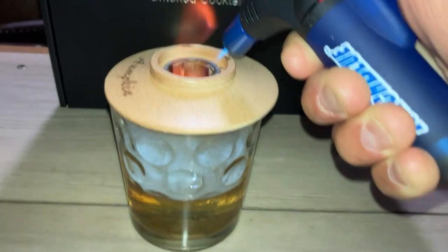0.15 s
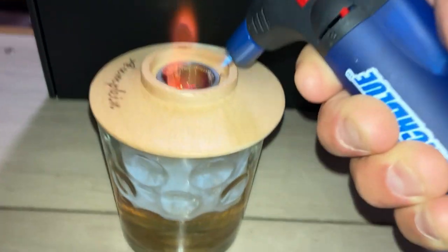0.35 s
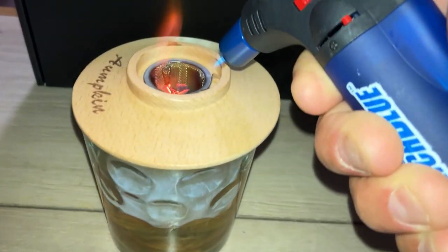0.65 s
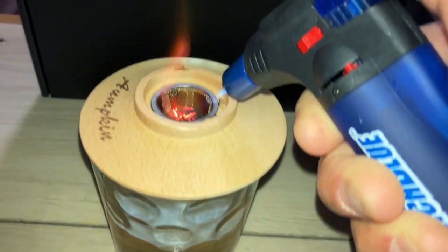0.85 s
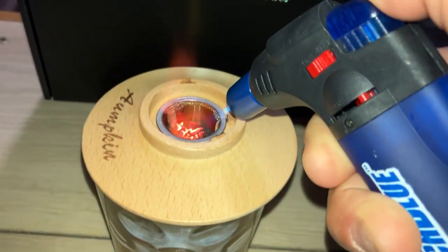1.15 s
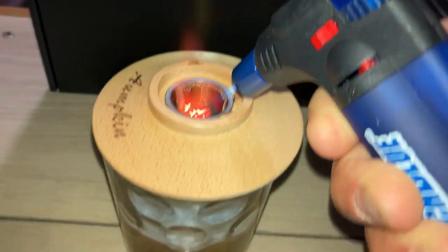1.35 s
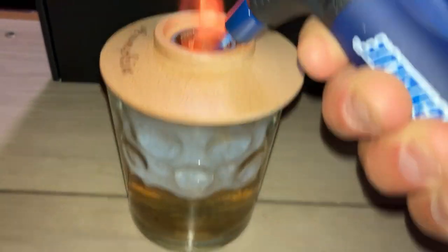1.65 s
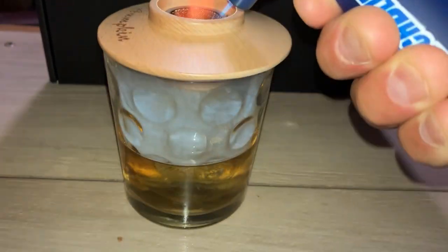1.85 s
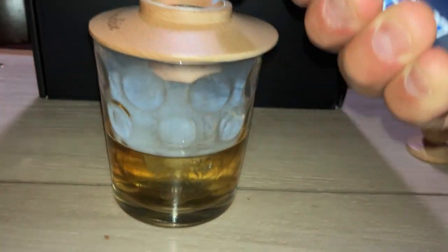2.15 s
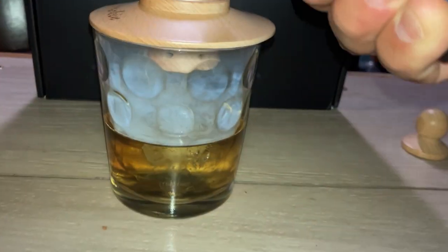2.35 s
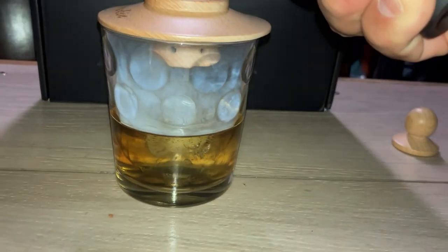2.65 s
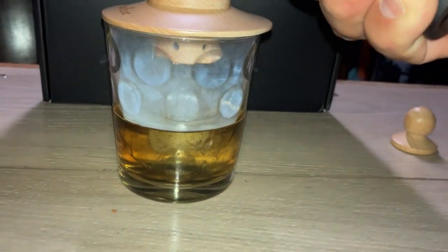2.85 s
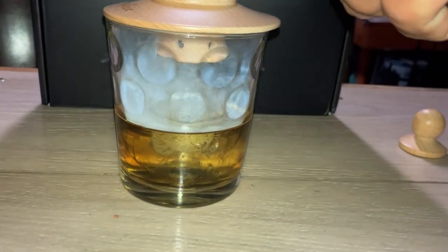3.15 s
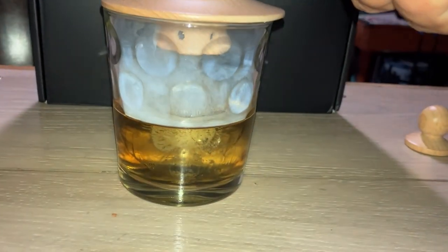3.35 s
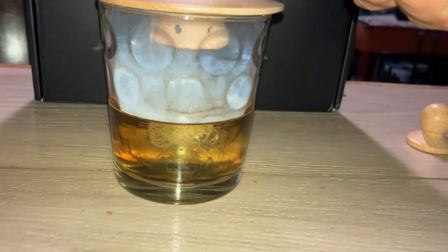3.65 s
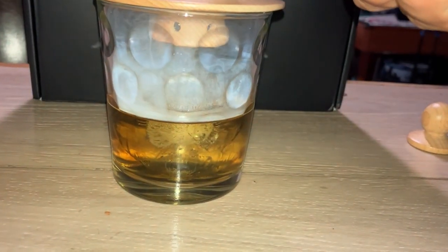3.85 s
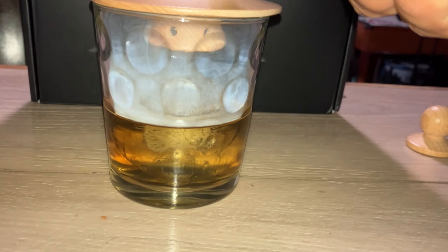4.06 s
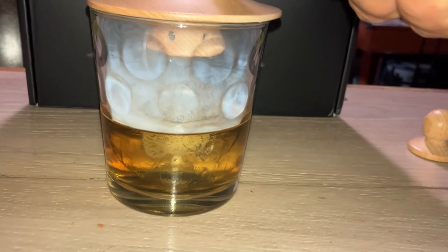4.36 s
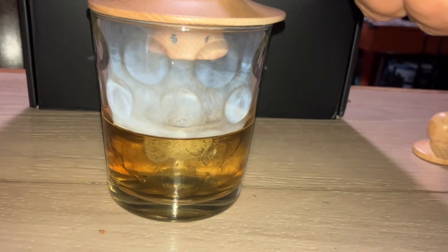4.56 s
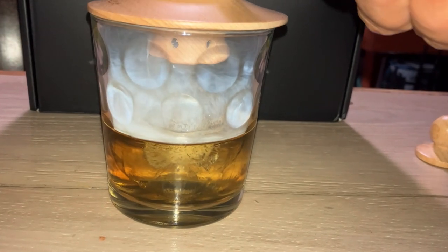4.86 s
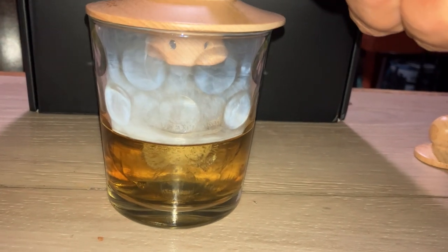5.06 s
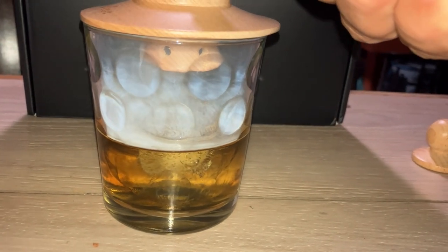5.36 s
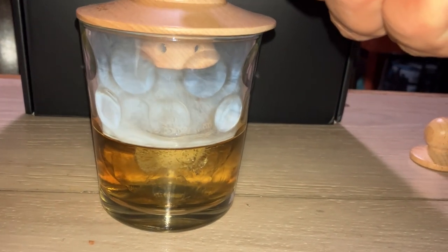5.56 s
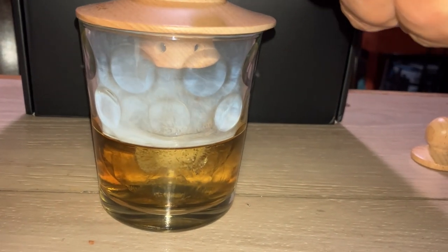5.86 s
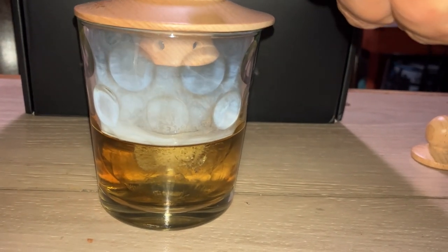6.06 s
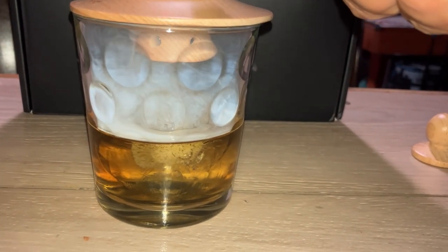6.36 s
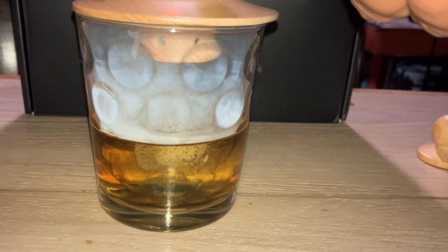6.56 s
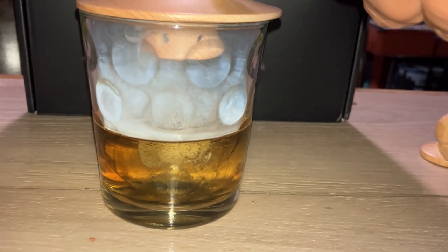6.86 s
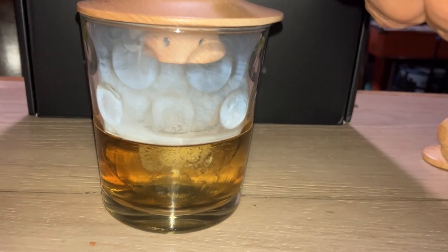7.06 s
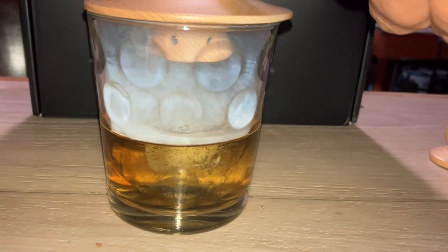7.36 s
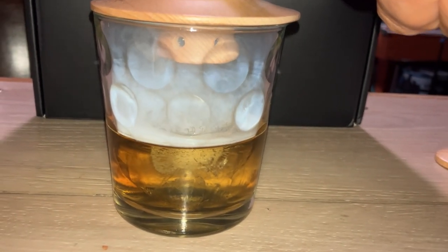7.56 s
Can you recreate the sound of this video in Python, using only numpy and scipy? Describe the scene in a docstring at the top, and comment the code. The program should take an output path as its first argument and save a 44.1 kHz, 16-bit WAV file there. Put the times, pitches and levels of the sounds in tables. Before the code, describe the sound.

A small gas torch hisses and roars hollowly inside a little wooden cup, then burns steadily in open air over a low refrigerator hum.

```python
"""In a small room, a handheld butane torch burns into the wood-chip cup of a cocktail smoker, close to the microphone.
The gas jet is very high, shaped noise that hisses. The flame is patchy noise: it roars in the cup's cavity,
whose resonances swell and sink, then it is lifted away and burns in free air.
Behind it a refrigerator hums and throbs as steady tones over the room's rumble of low noise.
At the start the hand makes two soft bumps, each a short ring of fading tones."""
import sys
import numpy as np
from scipy import signal
from scipy.fft import rfft, irfft, next_fast_len
from scipy.io import wavfile
from scipy.ndimage import uniform_filter1d, map_coordinates

SR = 44100
rng = np.random.default_rng(int(sys.argv[2]) if len(sys.argv) > 2 else 0)


def persist_wave(psi):
    """Save psi, clipped to +-1, as 16-bit WAV."""
    counts = np.round(np.clip(psi, -1, 1) * 32767).astype(np.int16)
    wavfile.write(sys.argv[1], SR, np.atleast_2d(counts).T)


N = 340398  # length in samples
FRAME = 1024  # length of one short-time spectrum, in samples


def amp(db):
    """Turn decibels into gain."""
    return 10 ** (np.asarray(db) / 20)


def bell(x, centre, width):
    """A smooth hump of height 1."""
    return np.exp(-((x - centre) / width) ** 2)


def along(points, hz):
    """Read (Hz, value) points on a log-frequency axis."""
    point_hz, values = np.transpose(points)
    return np.interp(np.log(hz + 1), np.log(point_hz + 1), values)


def density(points, hz):
    """A spectrum in dB that falls by a further 60 dB per octave above its last point."""
    octaves_above = np.log2(np.maximum(hz / points[-1][0], 1))
    return along(points, hz) - 60 * octaves_above


def grid():
    """Frequencies (a column) and times (a row) of the short-time spectrum."""
    hz, s, _ = signal.stft(np.zeros(N), SR, nperseg=FRAME)
    return hz[:, None], s


def curves(rows, s):
    """Read each column of a curve table at the times s."""
    times, *columns = np.transpose(rows)
    return [np.interp(s, times, column) for column in columns]


def wobble(s, rate):
    """A smooth random curve with this many knots a second."""
    knots = rng.standard_normal(int(s[-1] * rate) + 4)
    return map_coordinates(knots, [s * rate])


# How alike the two channels are for torch and room.
# Each row: frequency in Hz, left-right likeness from 0 to 1.
CHANNEL_ALIKE = [(60, .97), (160, .96), (300, .8), (500, .6), (650, .8), (820, .5), (1000, .75),
                 (1300, .65), (1500, .88), (1750, .98), (1860, .98), (2000, .9), (2120, .6), (2550, .9),
                 (2900, .65), (3200, .7), (3600, .2), (4200, .4), (4700, .87), (5100, .8), (5450, .15),
                 (6000, .9), (6300, .97), (8500, .88), (9800, .98), (11000, .92), (13500, .96),
                 (15000, .96), (15800, .7)]
# Phase between the two channels for torch and room.
# Each row: frequency in Hz, phase by which left leads in radians.
CHANNEL_PHASE = [(0, 0), (350, -.2), (700, 0), (820, -2.8), (900, -1.6), (1000, -.6), (1270, -1.4),
                 (1450, -.8), (1820, -3.14), (1980, -4.1), (2280, -9.9), (2450, -9.5), (2830, -10.9),
                 (2940, -15.6), (3080, -16.2), (3400, -18.8), (3600, -22), (4000, -24.1), (5100, -25.8),
                 (5400, -26), (5650, -28.1), (6370, -28.35), (9390, -22.4), (10200, -21.7), (11100, -19),
                 (11600, -18.5), (14600, -12.9), (15900, -10.6)]
# How the level differs between the two channels.
# Each row: frequency in Hz, left minus right in dB.
CHANNEL_TILT = [(60, 14.5), (200, -2.5), (400, 0.5), (500, -4), (650, -1.5), (800, -2), (920, -8.5),
                (1080, -2.5), (1300, -5), (1550, -1.5), (1830, 0), (2060, 0), (2150, -2.5), (2260, -2),
                (2420, -6), (2620, 2), (2950, -5), (3500, -0.5), (6000, 0)]


def turbulence(level_db, patchy_db, alike=CHANNEL_ALIKE, phase=CHANNEL_PHASE, slide=1):
    """Stereo noise with a level per Hz that can move in time, broken into small eddies of random strength."""
    hz, _ = grid()
    noise = rng.standard_normal((2, N))
    # sqrt(SR / 2) gives the noise a level of 0 dB per Hz
    common, diffuse = signal.stft(noise, SR, nperseg=FRAME)[2] * np.sqrt(SR / 2)

    eddies = rng.standard_normal(common.shape)
    eddies = uniform_filter1d(eddies, size=9, axis=0)
    eddies = uniform_filter1d(eddies, size=7, axis=1)
    gain = amp(level_db + patchy_db * eddies / eddies.std())

    # the common part is in both channels; the diffuse part sets them apart
    pattern_hz = hz / slide
    turn = np.arccos(np.clip(along(alike, pattern_hz), 0, 1)) / 2
    half_phase = np.exp(.5j * np.interp(pattern_hz, *np.transpose(phase)))
    balance = amp(along(CHANNEL_TILT, pattern_hz) / 2) * half_phase
    left = (np.cos(turn) * common + np.sin(turn) * diffuse) * balance
    right = (np.cos(turn) * common - np.sin(turn) * diffuse) / balance
    return signal.istft(np.array([left, right]) * gain, SR, nperseg=FRAME)[1][:, :N]


# Short echoes from nearby surfaces.
# Each row: mean delay in seconds, strength as a share, sway of the delay in seconds.
NEAR_ECHOES = [(.0011, .16, .00002), (.0019, .16, .00003), (.0031, .12, .00004)]


def reflections(hz, s):
    """Ripple in dB from lid, box and table: their short echoes slide as the hand sways, and comb the sound."""
    total = 1
    for delay, share, sway in NEAR_ECHOES:
        moving_delay = delay + sway * wobble(s, rate=1.56)
        total = total + share * np.exp(-2j * np.pi * hz * moving_delay)
    return 20 * np.log10(np.abs(total) + 1e-3)


# The room's low rumble, before its slight patchiness.
# Each row: frequency in Hz, level in dB per Hz.
ROOM_RUMBLE = [(20, -100), (38, -98), (80, -69), (106, -47), (117, -57.5), (124, -61.5), (135, -54.5),
               (150, -58), (175, -60.5), (205, -62.5), (225, -60), (268, -58.5), (292, -64), (314, -64),
               (335, -61.5), (360, -72.5), (400, -70), (600, -77.5), (1200, -114)]


def room():
    """Moving air and machinery fill the room with a low, even rumble."""
    hz, _ = grid()
    return turbulence(density(ROOM_RUMBLE, hz), patchy_db=0.5)


# The tones of the refrigerator's compressor and fan, before waver and swell.
# Each row: frequency in Hz, rms level in dB.
FRIDGE_TONES = [(35.5, -71), (49.2, -60.5), (59.1, -42.5), (112.6, -36), (120.0, -43.5), (159.3, -49),
                (181.5, -52.5), (318.5, -55), (337.7, -54.5)]
# The hum swells as the microphone moves through the room's standing waves.
# Each row: time in seconds, gain in dB.
FRIDGE_SWELL = [(0, -1), (0.8, 0.5), (2.2, 2), (3.5, 1.5), (4.8, 1), (5.8, 2), (7.7, 2)]


def refrigerator(drift_rad=0.097, waver_db=0.36):
    """Steady motor tones; twice the shaft speed beats against twice the mains about seven times a second."""
    t = np.arange(N) / SR
    swell_db, = curves(FRIDGE_SWELL, t)
    hum = np.zeros(N)
    for hz, db in FRIDGE_TONES:
        phase = 2 * np.pi * (hz * t + rng.random()) + drift_rad * wobble(t, rate=1.83)
        peak = np.sqrt(2) * amp(db + waver_db * wobble(t, rate=3.53))
        hum += peak * np.sin(phase)
    return amp(swell_db) * hum


# The soft bumps of the hand.
# Each row: start in seconds, level in dB.
HAND_BUMPS = [(0.0868, -24), (0.225, -18.5)]
# The tones that each bump rings with.
# Each row: frequency in Hz, level in dB relative to the bump, time in seconds to fade by 60 dB.
BUMP_TONES = [(480, -8, .022), (655, 0, .021), (850, -9, .014)]


def bumps(attack_s=0.001):
    """Each soft contact rings a few modes that die away quickly."""
    out = np.zeros(N)
    t = np.arange(SR // 10) / SR
    ring = np.zeros(len(t))
    for hz, db, t60 in BUMP_TONES:
        ring += amp(db - 60 * t / t60) * np.sin(2 * np.pi * hz * t)
    ring *= 1 - np.exp(-t / attack_s)
    for start, db in HAND_BUMPS:
        out[round(start * SR):][:len(t)] += amp(db) * ring
    return out


# The hiss of the nozzle.
# Each row: frequency in Hz, dB per Hz relative to the jet's level.
JET_HISS = [(11800, -77.5), (12600, -52), (13200, -39), (13650, -32.5), (14200, -33), (14750, -33),
            (15100, -36), (15400, -39), (15800, -45)]
# Level of that hiss over time.
# Each row: time in seconds, level in dB.
JET_LEVEL = [(0, -31), (.17, -32), (.25, -35.5), (.45, -32.5), (.7, -32.5), (1.04, -37), (1.4, -35),
             (1.6, -34.5), (1.8, -44), (1.95, -38.5), (2.03, -38), (2.16, -36), (2.3, -41.5), (2.45, -41.5),
             (2.69, -35.5), (2.87, -43), (3.14, -37), (3.38, -41), (3.72, -43), (3.82, -40), (4.45, -38),
             (4.56, -33.5), (4.71, -36.5), (4.9, -33), (5.27, -40.5), (5.42, -37.5), (6.3, -36),
             (7.0, -35.5), (7.35, -39), (7.72, -37)]
# The lower shoulder of the hiss.
# Each row: frequency in Hz, dB per Hz relative to the shoulder's level.
SHOULDER_HISS = [(9000, -89), (10300, -38), (11000, -34.5), (11450, -32), (12050, -30.5), (12450, -24),
                 (12900, -23), (13400, -28), (14000, -51)]
# Level of the lower shoulder.
# Each row: time in seconds, level in dB.
SHOULDER_LEVEL = [(0.0, -52.5), (0.6, -46.5), (1.63, -48), (2.15, -46), (2.34, -50), (2.43, -53),
                  (2.73, -54), (2.84, -54.5), (3.24, -54), (3.53, -55), (4.02, -54), (4.43, -47.5),
                  (4.73, -50), (4.84, -47.5), (5.7, -51.5), (6.81, -47), (7.52, -48.5), (7.72, -48)]
# A bright band in the upper hiss that glides as the nozzle turns.
# Each row: time in seconds, centre in Hz, height in dB.
BRIGHT_BAND = [(0, 14700, 0), (.2, 14700, 7), (.35, 13800, 2), (.6, 13800, 5), (.8, 13900, 7),
               (1.1, 14200, 3), (1.35, 14500, 5), (1.47, 14000, 8), (1.62, 14750, 5), (1.77, 14500, 2),
               (1.97, 14400, 3), (2.17, 14200, 6), (2.3, 14650, 5), (2.45, 14200, 8), (2.7, 14400, 5.5),
               (2.88, 14900, 7), (3.15, 14950, 7), (3.35, 15200, 5), (3.55, 13900, 4), (3.9, 14200, 8),
               (4.3, 14300, 5), (4.6, 14300, 4), (4.9, 14050, 5.5), (5.4, 14000, 3.5), (6.3, 14000, 3.5),
               (7.1, 13800, 0.5), (7.72, 13750, 6)]
# A gliding band, mostly below the bright one; it is dark, or bright where the depth is negative.
# Each row: time in seconds, centre in Hz, depth in dB.
DARK_BAND = [(0, 12700, 6), (.4, 12600, 4), (2.2, 12900, 0), (2.4, 13050, 7), (2.9, 12900, 2),
             (3.3, 12200, -3), (3.6, 12300, 7), (4.1, 12600, 8), (4.5, 12350, -1), (5.1, 12450, -1),
             (5.5, 12500, 5), (6.2, 12650, 7), (7.2, 13000, 6), (7.72, 13050, 4)]
BRIGHT_WIDTH_HZ, DARK_WIDTH_HZ = 350, 260  # half-widths


def jet():
    """Gas leaves the tiny nozzle with a high hiss; a bright and a dark band glide through it."""
    hz, s = grid()
    level_db, = curves(JET_LEVEL, s)
    shoulder_db, = curves(SHOULDER_LEVEL, s)
    bright_hz, height_db = curves(BRIGHT_BAND, s)
    dark_hz, depth_db = curves(DARK_BAND, s)

    bright_db = height_db * bell(hz, bright_hz, BRIGHT_WIDTH_HZ)
    colour_db = 0.51 * reflections(hz, s) + 0.28 * wobble(s, rate=18)
    colour_db = colour_db - depth_db * bell(hz, dark_hz, DARK_WIDTH_HZ)
    top = turbulence(density(JET_HISS, hz) + level_db + bright_db + colour_db, patchy_db=1.0)
    shoulder = turbulence(density(SHOULDER_HISS, hz) + shoulder_db + colour_db, patchy_db=1.3)
    return top + shoulder


# The nozzle swoops into the cup and out again: when it is closest, and how long each way takes.
CLOSEST_S, SWOOP_S = 1.054, 1.114


def nozzle_gap(s):
    """How far the nozzle is from the bottom of its swoop: 0 deep in the cup, 1 at the rim."""
    return np.minimum(((s - CLOSEST_S) / SWOOP_S) ** 2, 1)


# The roar in the cup, with its cavity at rest pitch.
# Each row: frequency in Hz, dB per Hz before the moving level.
CUP_ROAR = [(500, -98), (800, -79), (1030, -70), (1280, -77.5), (1470, -69.5), (1640, -61), (1900, -62),
            (2100, -74), (2300, -77), (2500, -72), (2750, -76), (3030, -77.5), (3380, -83.5), (3650, -81),
            (4100, -99), (4500, -85.5), (5800, -92), (7300, -104)]
# The cup's second resonance, which shifts with the angle of the flame.
# Each row: time in seconds, centre in Hz, boost in dB.
CUP_OVERTONE = [(0, 2920, 1), (.35, 2740, 4.5), (.65, 2630, 3), (.9, 3200, 6), (1.25, 3080, 9),
                (1.62, 3100, 11), (1.78, 2860, 10), (2.05, 2700, 6), (2.35, 2900, 13)]
# Phase between the two channels for the burning cup.
# Each row: frequency in Hz, phase by which left leads in radians, before the pattern slides.
CUP_PHASE = [(0, 0), (750, -.3), (820, -1), (950, -.2), (1280, -1.7), (1480, -1), (1820, -2.75),
             (1950, -3.12), (2150, -3.2), (2300, -4.2), (2500, -6.1), (2800, -10.3), (3360, -12.4),
             (4130, -18.8), (4700, -19.3), (5080, -24.8), (5510, -28.2), (7150, -27.9), (8790, -24.2),
             (15900, -10.4)]
# The close cup is almost the same in both channels around 2000 Hz.
# Each row: frequency in Hz, left-right likeness from 0 to 1, before the pattern slides.
CUP_LIKENESS = [(700, 0.3), (1050, 0.7), (1500, .9), (1900, .99), (2120, .99), (2250, .93), (2700, 0.65),
                (3500, .9), (4000, .95)]
# At its closest the cup is loudest and its cavity lowest.
CUP_DB, CAVITY_HZ = 1.5, 1705
# At the rim it is weaker and higher, more so in pitch going in than coming out.
RIM_LOSS_DB, ENTRY_RISE_HZ, EXIT_RISE_HZ = 10, 197, 25
CLEAR_S = 2.43  # when the flame clears the rim
OVERTONE_WIDTH_HZ = 290  # half-width
# Away from the closest point the stereo pattern slides up by this share, mostly within this nozzle gap.
PATTERN_SLIDE, SLIDE_GAP = 0.063, 0.36
FLUTTER_DB = .4  # unsteadiness of the cup and of the open flame


def cup(rest_hz=1720, release_db_per_s=330):
    """The flame blows the cup's cavity; its resonances swell and sink with the gap, and die past the rim."""
    hz, s = grid()
    gap = nozzle_gap(s)
    release_db = release_db_per_s * np.maximum(s - CLEAR_S, 0)
    level_db = CUP_DB - RIM_LOSS_DB * gap ** 2 - release_db
    rise_hz = np.where(s < CLOSEST_S, ENTRY_RISE_HZ, EXIT_RISE_HZ)
    stretch = rest_hz / (CAVITY_HZ + rise_hz * gap)

    overtone_hz, boost_db = curves(CUP_OVERTONE, s)
    colour_db = density(CUP_ROAR, hz * stretch)
    colour_db = colour_db + boost_db * bell(hz, overtone_hz, OVERTONE_WIDTH_HZ)
    flutter_db = FLUTTER_DB * wobble(s, rate=9.96)
    slide = 1 + PATTERN_SLIDE * np.tanh(gap / SLIDE_GAP)
    return turbulence(colour_db + level_db + flutter_db, patchy_db=1.5,
                      alike=CUP_LIKENESS, phase=CUP_PHASE, slide=slide)


# The roar in free air.
# Each row: frequency in Hz, dB per Hz before the moving level and slope.
OPEN_ROAR = [(250, -78), (480, -79.5), (560, -70), (670, -72.5), (750, -78), (820, -83), (880, -77),
             (1020, -74), (1150, -76.5), (1330, -76), (1480, -75), (1620, -68.5), (1720, -76.5),
             (1830, -76), (1920, -72.5), (2120, -78), (2260, -79.5), (2400, -74), (2540, -75.5),
             (2720, -77), (2900, -77.5), (3050, -79.5), (3450, -88.5), (4500, -99.5)]
# Level of the open flame, before the cup's shade and the dip.
# Each row: time in seconds, level in dB.
OPEN_LEVEL = [(2.65, 0.5), (4.12, 1), (4.52, 3), (5.0, 3.5), (5.87, 1.73), (7.72, 3.5)]
# The rush of gas through the burner.
# Each row: frequency in Hz, dB per Hz before the moving level and slope.
GAS_RUSH = [(2500, -106), (3700, -88), (4150, -85), (4650, -84), (4900, -80.5), (5600, -86), (5950, -85),
            (6300, -95.5), (6800, -82.5), (7500, -86.5), (8200, -81), (9150, -83), (9700, -96),
            (10300, -101), (12000, -105)]
# Brightness of the rush.
# Each row: time in seconds, slope in dB per octave.
RUSH_BRIGHTNESS = [(0, -8.5), (.74, 0.5), (1.54, -5), (2.0, 7), (2.52, -1.5), (3.8, 0.5), (5.31, 2.5),
                   (5.55, 9), (7.72, 1.5)]
# Uneven colour of the rush in the first two seconds or so.
# Each row: frequency in Hz, gain in dB.
EARLY_COLOUR = [(3500, -8), (4100, -5), (4600, -1.5), (5400, -4.5), (5850, 6), (6350, 1), (7350, -5),
                (8100, 2.5), (8600, -1.5), (9200, 9.5), (10500, -7)]
# When this early colour starts to fade, and when it is gone.
# The two values are times in seconds.
EARLY_FADE = (1.8, 2.5)
# The cup swallows up to this much of the open roar.
CUP_SHADE_DB = 10.5
# The roar's slope in dB per octave rises with each dB of its level.
ROAR_SLOPE_DB, BRIGHTER_PER_DB = -0.5, 0.83
# The rush is beamed sideways, and loses this much for each dB that the open flame gains.
RUSH_DB, RUSH_LOSS_PER_DB = -1.8, 0.36
# The sound dips briefly just as the flame leaves the cup: timing, then depth in roar and rush.
DIP_S, DIP_FALL_S, DIP_RECOVER_S = 2.475, .038, .06
DIP_ROAR_DB, DIP_RUSH_DB = 4, 7.5
# A band of the open roar grows slowly: centre, half-width, start, growth.
RING_HZ, RING_WIDTH_HZ, RING_FROM_S, RING_DB_PER_S = 2120, 140, 3.5, .8


def flame(roar_pivot_hz=1600, rush_pivot_hz=5700):
    """Turbulent burning roars in the middle range, brighter when louder; gas rushes through the burner above it."""
    hz, s = grid()
    fall = bell(s, DIP_S, DIP_FALL_S)
    recovery = np.exp(-np.abs(s - DIP_S) / DIP_RECOVER_S)
    dip = np.where(s < DIP_S, fall, recovery)
    open_db, = curves(OPEN_LEVEL, s)
    rush_slope, = curves(RUSH_BRIGHTNESS, s)

    # both slopes tilt the sound within one octave of their pivot
    roar_db = open_db - CUP_SHADE_DB * (1 - nozzle_gap(s) ** 2) - DIP_ROAR_DB * dip
    roar_slope = ROAR_SLOPE_DB + BRIGHTER_PER_DB * roar_db
    roar_db = roar_db + roar_slope * np.log2((hz + 1) / roar_pivot_hz).clip(-1, 1)
    ring_db = RING_DB_PER_S * np.maximum(s - RING_FROM_S, 0)
    roar_db = roar_db + ring_db * bell(hz, RING_HZ, RING_WIDTH_HZ)

    early = np.interp(s, EARLY_FADE, [1, 0])
    rush_db = RUSH_DB - RUSH_LOSS_PER_DB * open_db - DIP_RUSH_DB * dip
    rush_db = rush_db + along(EARLY_COLOUR, hz) * early
    rush_db = rush_db + rush_slope * np.log2((hz + 1) / rush_pivot_hz).clip(-1, 1)
    rush_db = rush_db + .5 * reflections(hz, s)

    # the gas flow is slightly unsteady, and moves roar and rush together
    flutter_db = FLUTTER_DB * wobble(s, rate=18)
    roar = turbulence(density(OPEN_ROAR, hz) + roar_db + flutter_db, patchy_db=1.16)
    rush = turbulence(density(GAS_RUSH, hz) + rush_db + flutter_db, patchy_db=2.4)
    return roar + rush


def scene():
    """The room behind, the torch in front of it."""
    background = room() + refrigerator()
    torch = jet() + cup() + flame()
    return background + bumps() + torch


TOP_HZ = 15800  # band limit


def record(dry):
    """Keep nothing at or above the band limit."""
    size = next_fast_len(N + SR // 2)
    kept = np.fft.rfftfreq(size, 1 / SR) < TOP_HZ
    return irfft(rfft(dry, size) * kept, size)[:, :N]


dry = scene()
out = record(dry)
persist_wave(out)
```